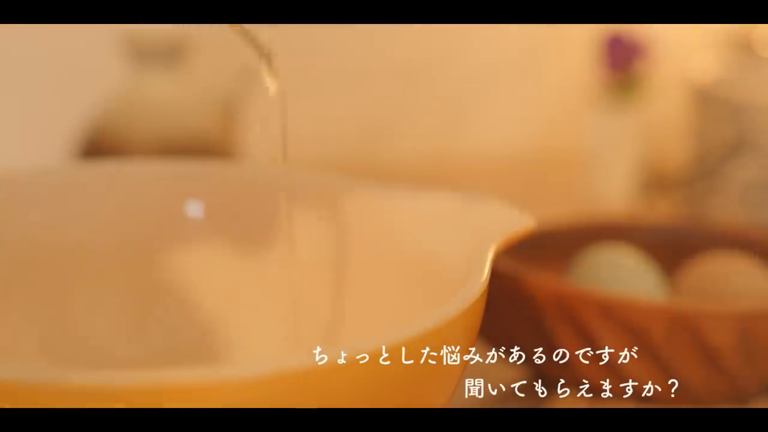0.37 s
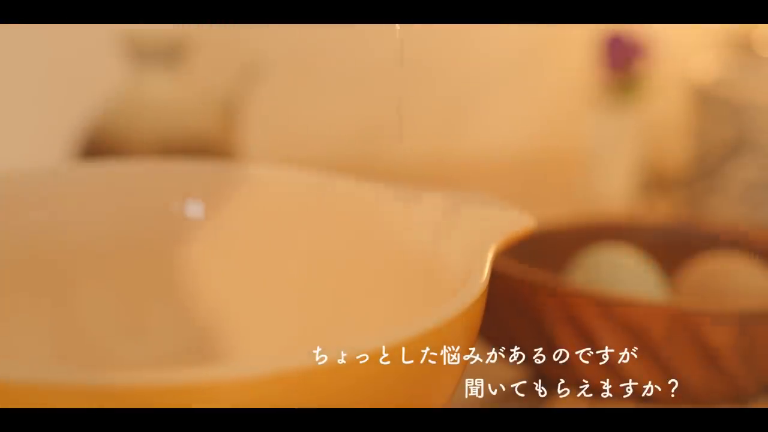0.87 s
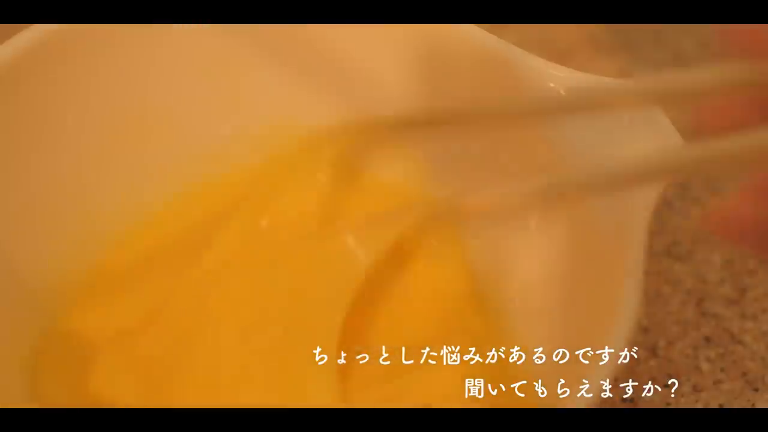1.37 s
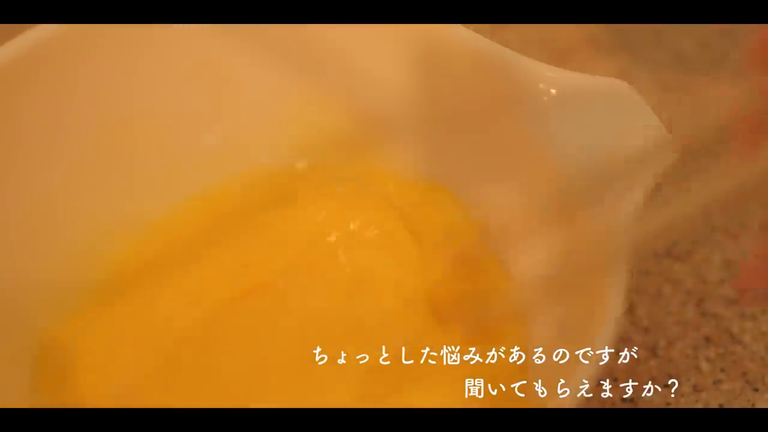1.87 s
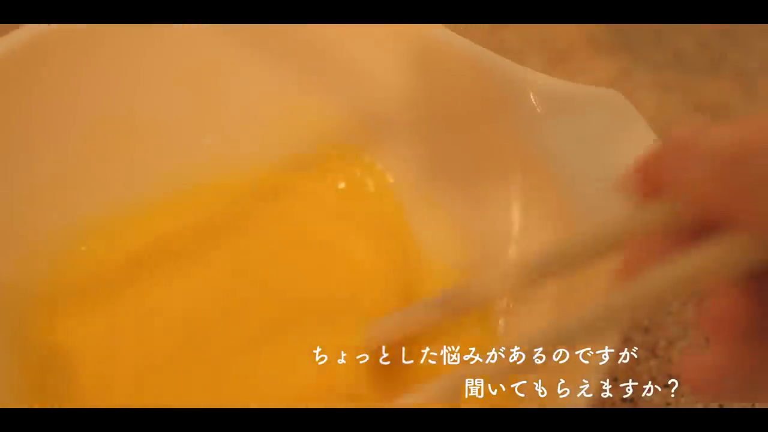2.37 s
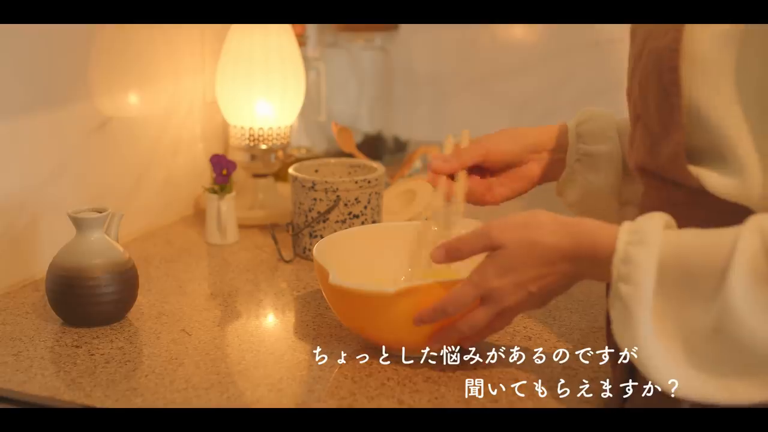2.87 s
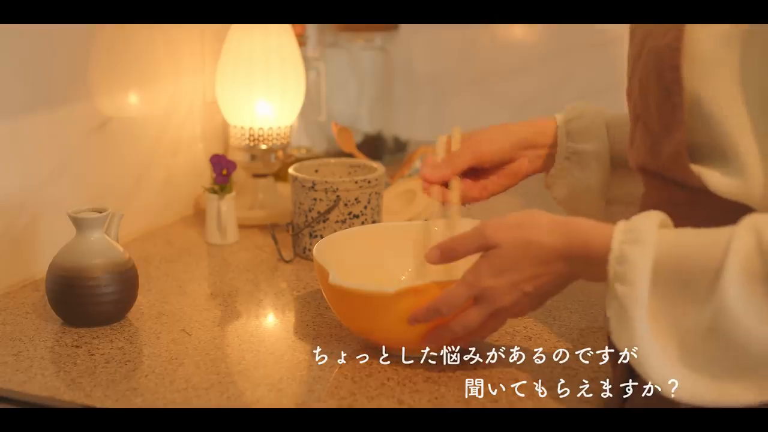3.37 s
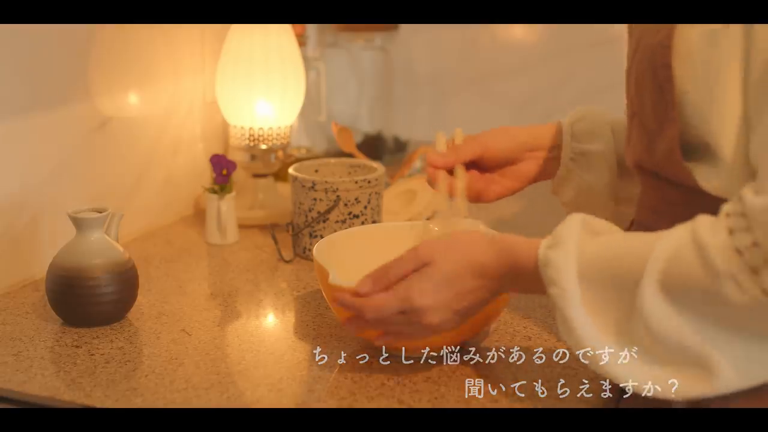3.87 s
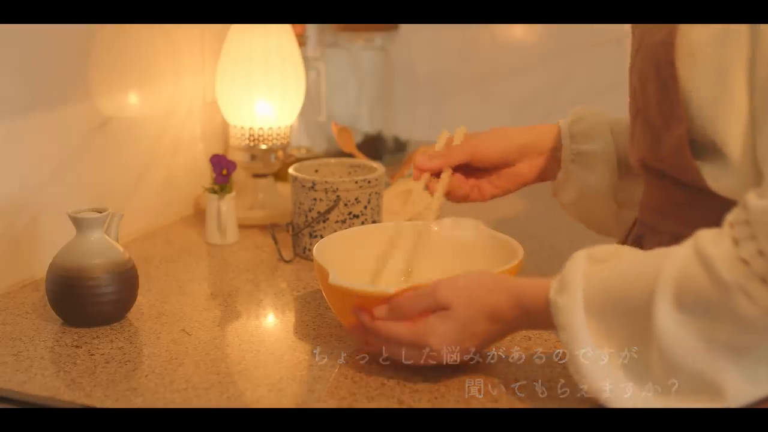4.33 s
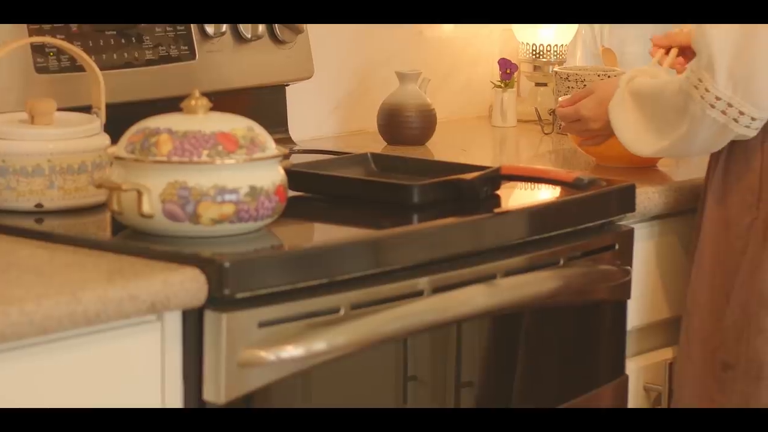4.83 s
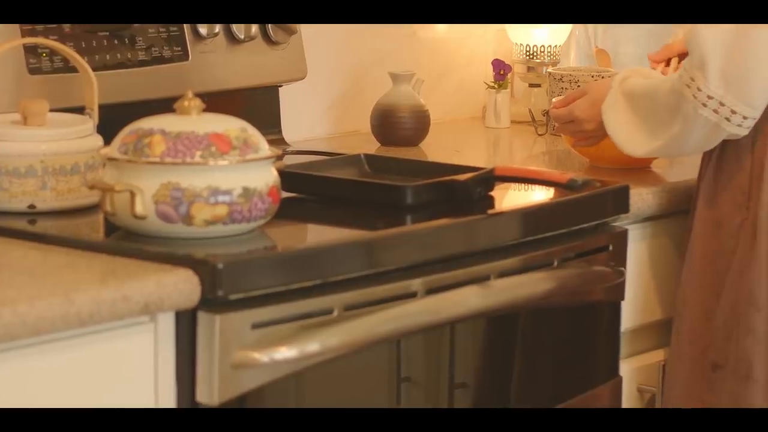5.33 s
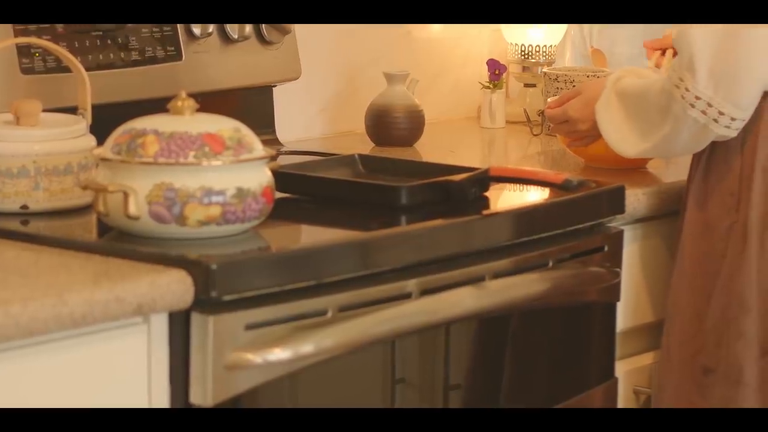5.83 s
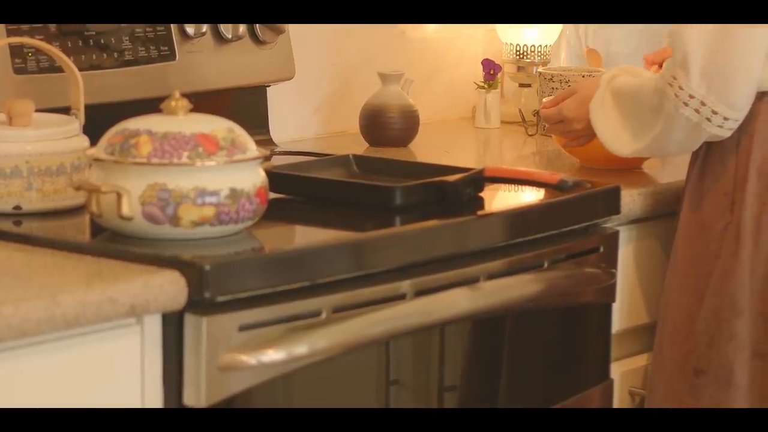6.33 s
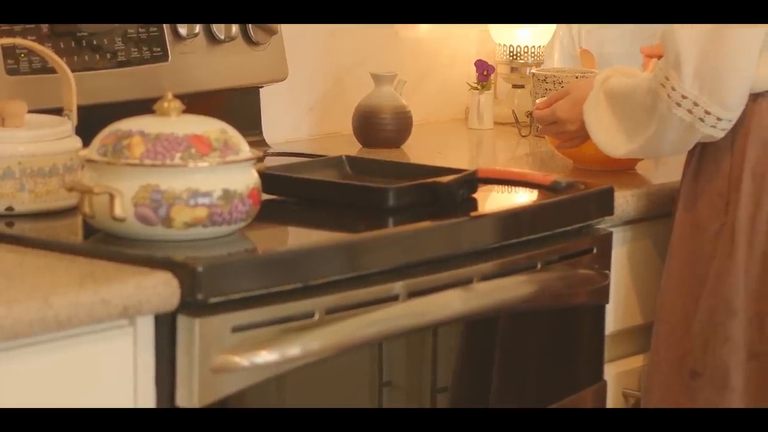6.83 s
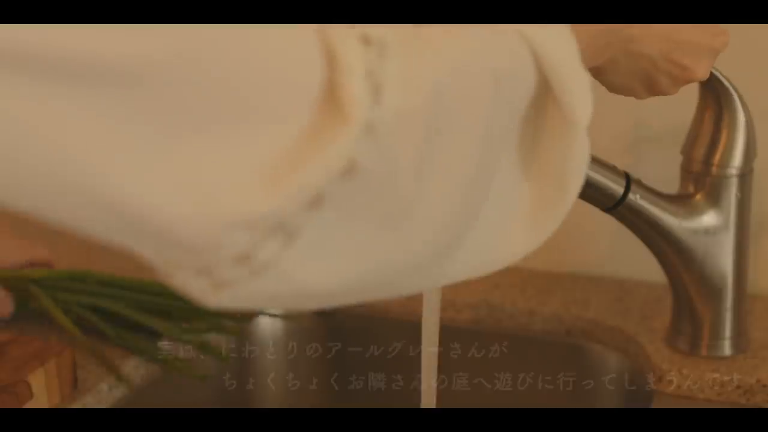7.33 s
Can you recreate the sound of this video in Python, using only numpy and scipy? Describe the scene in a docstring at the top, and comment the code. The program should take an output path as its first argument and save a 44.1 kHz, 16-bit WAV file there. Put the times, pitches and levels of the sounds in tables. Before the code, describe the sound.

Wet eggshell snaps give way to rapid clinking and sloshing of beaten eggs, ending with a hard cut to a gurgling, spraying kitchen tap.

```python
"""An eggshell is pulled apart in wet cracks: snaps, grainy hisses and the plops of small air pockets.
Sticks then beat eggs in a glazed bowl, close at first, then from further off, then the close opening again:
every blow sets the bowl's modes ringing, the egg slaps, sloshes and froths, and a small hard kitchen rings after.
Last, a hard cut to a steel sink: a tap gurgles, whistles and sprays (shaped noise) and the steel hums."""
import sys
import numpy as np
from scipy import signal
from scipy.fft import rfft, irfft, next_fast_len
from scipy.io import wavfile

SR = 44100
rng = np.random.default_rng(int(sys.argv[2]) if len(sys.argv) > 2 else 0)


def put_to_file(sound):
    """Save the sound as 16-bit audio at rate SR, in the file named by the first command-line argument."""
    columns = np.atleast_2d(sound).T  # one column per channel
    safe = np.clip(columns, -1, 1)
    whole_steps = np.round(safe * 32767)
    wavfile.write(sys.argv[1], SR, whole_steps.astype(np.int16))


def ratio(d):
    """dB to gain"""
    e = np.asarray(d, float) / 20
    return 10 ** e


N = 339570

# starts [s]: close beating, wider beating, close beating again, sink
CLOSE_S, WIDE_S, AGAIN_S, SINK_S = 1.2815, 2.615, 4.7398, 6.964
# sticks hitting the bowl, levels relative: (time [s], crack level [dB],
# ring level near 2.4 kHz [dB], near 3.8 kHz [dB], near 5.5 kHz [dB])
BLOWS = [(2.65, -8.5, -29, -24.5, -37), (2.851, -14, -27.5, -26.5, -39.5), (3.047, -20, -27, -30.5, -33.5),
         (3.234, -7, -23.5, -26.5, -31), (3.434, -14.5, -24, -29, -28), (3.63, -17.5, -19, -22.5, -29),
         (3.84, -12.5, -20.5, -27, -27), (4.057, -18.5, -30.5, -29.5, -30.5),
         (4.262, -16.5, -31.5, -35.5, -36.5), (4.455, -6.5, -26, -31.5, -29),
         (4.665, -13, -29.5, -25.5, -28.5), (4.756, -8.5, -25.5, -26, -33), (4.987, -14, -29, -29, -48.5),
         (5.204, -12.5, -22, -32, -30.5), (5.449, -14.5, -30, -28.5, -32.5),
         (5.628, -7.5, -15.5, -17.5, -11.5), (5.873, -9.5, -33, -26, -36.5), (6.078, -13, -28, -27, -57),
         (6.313, -17, -34, -33, -64.5), (6.507, -17, -34.5, -36, -58), (6.754, -4, -42, -32, -60)]
# spectrum of a stick crack or egg slap: (frequency [Hz], level [dB per Hz])
CRACK_SPECTRUM = [(120, -18.5), (200, -10.5), (1360, 3), (3070, 6), (5160, 1.5), (7600, -1.5),
                  (11400, -26.5), (15000, -11.5), (16500, -42)]


def at_hz(points, hz):
    """Reads a table of values against frequency on a log-frequency axis."""
    return np.interp(np.log(hz), np.log(np.array(points)[:, 0]), np.array(points)[:, 1])


def in_time(rows):
    """Joins the rows of a time table by straight lines, one curve per column."""
    s, *columns = np.transpose(rows)
    return [np.interp(np.arange(N) / SR, s, column) for column in columns]


def coloured(x, spectrum):
    """Gives a white signal a spectrum, keeping white noise at rms 1."""
    size = next_fast_len(len(x))
    gain = ratio(at_hz(spectrum, np.maximum(np.fft.rfftfreq(size, 1 / SR), 5)))
    gain = gain / np.sqrt(np.mean(gain ** 2))
    return irfft(rfft(x, size) * gain, size)[:len(x)]


def band(x, low_hz, high_hz):
    """Band-passes a signal and sets it to rms 1."""
    sos = signal.butter(2, [low_hz, high_hz], "band", fs=SR, output="sos")
    y = signal.sosfilt(sos, x)
    return y / np.std(y)


def high_pass(x, hz):
    """Takes away the bass below a corner frequency."""
    return signal.sosfilt(signal.butter(4, hz, "high", fs=SR, output="sos"), x)


def ring(clicks, hz, t60):
    """A two-pole resonance: a unit click sets a sine of height 1 ringing."""
    r, w = ratio(-60 / (t60 * SR)), 2 * np.pi * hz / SR
    return signal.lfilter([0, np.sin(w)], [1, -2 * r * np.cos(w), r * r], clicks + 1e-18)


def hums(modes):
    """Noise twice through each narrow resonance (frequency [Hz], width [Hz], level [dB])."""
    out = 0
    for hz, width_hz, level_db in modes:
        t60 = np.log(1000) / (np.pi * width_hz)
        tone = ring(ring(rng.standard_normal(N), hz, t60), hz, t60)
        out = out + ratio(level_db) * tone / tone.std()
    return out


def lumps(rate_hz, depth_db):
    """A gain that wanders at random: low-passed noise, read in dB."""
    step = 100   # samples per drawn point
    slow = rng.standard_normal(N // step + 2)
    slow = signal.lfilter([1], [1, -np.exp(-2 * np.pi * rate_hz * step / SR)], slow)
    wander = np.interp(np.arange(N) / step, np.arange(len(slow)), slow / slow.std())
    return ratio(depth_db * wander)


def ticks(rows, spectrum, t60, hiss_db, cycles):
    """Each tick is a snap, a grainy dying hiss and the short ring of an air pocket, rising as it closes."""
    size = 6000
    out, t = np.zeros(N + size), np.arange(size) / SR
    grain = ratio(2.9 * rng.standard_normal((len(rows), size // 40))).repeat(40, axis=1)
    noises = rng.standard_normal((len(rows), size)) * grain
    noises[:, 4] = ratio(14)   # a single click at first contact
    shape = ratio(-60 * t / t60) + ratio(2 - 60 * t / 0.0015)   # dying hiss, sharp snap
    for (s, level_db, hz, plop_db), noise in zip(rows, noises):
        burst = coloured(noise, spectrum) * ratio(level_db + hiss_db) * shape
        plop_fade = ratio(plop_db - 60 * t * np.sqrt(1000 * hz) / cycles)   # high plops die sooner
        plop = np.sin(2 * np.pi * hz * t * (1 + 1.1 * t)) * plop_fade * np.clip(t / 0.0018, 0, 1)
        flutter = band(noise, 60, 440)   # the wet wall of the pocket shakes
        at = round(s * SR)
        out[at:at + size] += burst + plop * (1 + 0.4 * flutter)
    return high_pass(out[:N], 520)


def followers(leads, latest_s, below_db, spread_db, low_hz, high_hz, plop_below_db):
    """Two smaller ticks at chance moments, levels and pitches after each lead (time [s], level [dB])."""
    s, db = np.repeat(leads, 2, axis=0).T
    draw = rng.random((len(s), 4))
    times = s + 0.0045 + latest_s * draw[:, 0]
    hisses_db = db - below_db + spread_db * (2 * draw[:, 1] - 1)
    pitches = low_hz * (high_hz / low_hz) ** draw[:, 2]
    plops_db = db - below_db - plop_below_db + spread_db * (2 * draw[:, 3] - 1)
    return list(zip(times, hisses_db, pitches, plops_db))


def kitchen(x, wet_db):
    """Adds a small hard room: half-octave bands of noise, each dying at its own rate."""
    # how long the room rings: (frequency [Hz], t60 [s])
    room_decay = [(100, 0.25), (700, 0.36), (2000, 0.49), (5000, 0.39), (13000, 0.36)]
    t, edges = np.arange(SR // 2) / SR, 70 * 2 ** np.arange(0, 8.6, .5)
    tail = 0
    for low, high in zip(edges, np.minimum(edges[1:], 19000)):
        decay = ratio(-60 * t / at_hz(room_decay, np.sqrt(low * high)))
        # equal power per Hz
        tail = tail + band(rng.standard_normal(len(t)), low, high) * np.sqrt(high - low) * decay
    tail = tail * np.clip((t - .002) / 0.004, 0, 1)   # reflections build up
    tail = tail / np.sqrt(np.sum(tail ** 2))
    return x + ratio(wet_db) * signal.fftconvolve(x, tail)[:N]


def eggshell():
    """Shell cracks and wet ticks, each trailed by smaller crackle."""
    # cracks, hiss relative: (time [s], hiss level [dB], plop starting pitch [Hz], plop level [dB])
    shell_cracks = [(0.0014, -33.5, 3410, -52), (0.049, -38, 3270, -58), (0.126, -35, 2270, -50),
                    (0.2084, -38, 1970, -43), (0.234, -34, 3040, -46), (0.2537, -32, 1700, -41),
                    (0.2628, -34, 2190, -37), (0.271, -31, 2310, -37), (0.2834, -56.5, 2900, -43),
                    (0.2894, -52, 1720, -49), (0.3127, -35, 1970, -42), (0.3156, -44, 1750, -40.5),
                    (0.3924, -45.5, 2270, -63), (0.4074, -50, 1230, -60), (0.4194, -50, 2030, -57),
                    (0.5605, -37.5, 3440, -35.5), (0.603, -26.5, 1460, -49), (0.614, -41, 3460, -52),
                    (0.6452, -34, 4600, -42), (0.7018, -42.5, 3430, -64), (0.7425, -51, 1210, -66),
                    (0.842, -56, 2620, -68), (0.862, -56, 3030, -66), (1.098, -61, 3000, -72)]
    # (frequency [Hz], level [dB per Hz])
    shell_spectrum = [(290, -58), (500, -26), (1070, -17), (2320, -6.5), (3350, -8.5), (11600, -18.5),
                      (15100, -19.5), (16500, -15)]
    crackle = followers(np.array(shell_cracks)[:, :2], latest_s=0.046, below_db=13.4, spread_db=4,
                        low_hz=1300, high_hz=4500, plop_below_db=21)
    return ticks(shell_cracks + crackle, shell_spectrum, t60=0.041, hiss_db=-15.5, cycles=54.0)


def quiet_room():
    """Bass-heavy background noise and a steady thin tone under the eggshell."""
    # (frequency [Hz], level [dB per Hz])
    quiet_spectrum = [(15, -0.5), (30, -2), (63, -15), (96, -9), (150, -21), (300, -16), (850, -18.5),
                      (1400, -21.5), (2200, -28), (5000, -39.5), (16500, -45)]
    tone = np.sin(2 * np.pi * 1195 * np.arange(N) / SR)
    return ratio(-67) * coloured(rng.standard_normal(N), quiet_spectrum) + ratio(-75) * tone


def whines():
    """Narrow whines of the kitchen: noise through sharp resonances."""
    # (frequency [Hz], resonance width [Hz], level [dB])
    whine_modes = [(7400, 90, -86)]
    return hums(whine_modes)


def stirred_egg():
    """A lumpy low slosh, small bubbles, a froth of fine clicks; each stroke swells them for a moment."""
    # (frequency [Hz], level [dB per Hz])
    froth_spectrum = [(300, -7), (1500, 12), (4000, 12), (8000, -6.5), (11500, -26), (15000, -7),
                      (16500, -26)]
    wide = np.arange(N) < AGAIN_S * SR
    # levels before the strokes swell them
    slosh_db, froth_db = np.where(wide, -44.0, -51.0), np.where(wide, -47.5, -57.0)
    blow_db = np.array(BLOWS)[:, 1]
    strokes = np.zeros(N)
    # the egg follows a share of each blow's swing in dB
    strokes[[round(row[0] * SR) for row in BLOWS]] = ratio(0.18 * (blow_db - blow_db.mean()))
    t = np.arange(SR // 5) / SR
    swell = signal.fftconvolve(strokes, t / 0.055 * np.exp(1 - (t / 0.04) ** 2))[:N]
    # a short froth hiss after each stroke, ending sharply
    froth_swell = signal.fftconvolve(strokes, np.exp(-((t - .05) / 0.051) ** 6))[:N]
    slosh = band(rng.standard_normal(N), 130, 2200) * lumps(25, depth_db=3.5)
    sizes = ratio(2.6 * np.minimum(rng.exponential(1, N), 4)) * rng.choice([-1, 1], N)
    born = rng.random(N) < 400 / SR   # 400 bubbles a second
    dealt = rng.integers(0, 8, N)     # each takes one of eight pitches
    bubbles = 0
    for k, hz in enumerate(np.geomspace(500, 4000, 8)):
        bubbles = bubbles + ring(sizes * born * (dealt == k), hz, 26.0 / hz)
    fine = sizes * (rng.random(N) < 9000 / SR)   # 9000 clicks a second
    froth = coloured(fine / fine.std(), froth_spectrum) * lumps(30, depth_db=4.0)
    wet = ratio(slosh_db) * (slosh + ratio(-10.5) * bubbles) * (0.52 + 1.6 * swell)
    return wet + ratio(froth_db) * froth * (.35 + 1.2 * froth_swell)


def egg_slaps():
    """Egg slaps and trapped-air plops; slaps and blows alike throw smaller spatter after them."""
    # slaps, hiss relative: (time [s], hiss level [dB], plop starting pitch [Hz], plop level [dB])
    slap_rows = [(2.643, -31, 900, -26), (2.838, -36, 1250, -45), (2.845, -34.5, 1300, -37),
                 (3.026, -33.5, 3000, -38), (3.034, -27.5, 2300, -17.5), (3.039, -18.5, 1600, -26),
                 (3.218, -50, 830, -33.5), (3.228, -34, 2000, -36), (3.470, -26, 1280, -48),
                 (3.667, -19.5, 585, -26.5), (3.87, -20.5, 5550, -34), (4.25, -17.5, 1530, -20),
                 (4.392, -52, 700, -36), (4.701, -31, 1470, -39), (4.742, -26.5, 925, -47),
                 (4.787, -33, 786, -36), (4.805, -25, 4000, -28), (4.933, -40.5, 1070, -42),
                 (4.956, -21, 2660, -27), (4.961, -15, 744, -24), (5.011, -21.5, 954, -26.5),
                 (5.165, -37.5, 1270, -35), (5.184, -23, 1880, -18.5), (5.192, -22, 910, -37),
                 (5.250, -20, 968, -20), (5.267, -26, 2800, -27), (5.620, -34, 2600, -30.5),
                 (5.627, -6, 2720, -8.5), (5.664, -25, 627, -27.5), (5.693, -33, 1046, -33),
                 (5.774, -55, 1020, -35), (5.835, -15.5, 640, -33), (6.057, -34, 1380, -40),
                 (6.061, -16, 5760, -13), (6.069, -23.5, 4200, -13.5), (6.112, -33, 697, -37),
                 (6.156, -31, 1530, -29), (6.276, -18.5, 690, -60), (6.304, -22, 2410, -32),
                 (6.376, -39, 1650, -26.5), (6.424, -24.5, 830, -44), (6.492, -11.5, 3160, -18.5),
                 (6.555, -21.5, 1290, -27), (6.57, -27, 2600, -27), (6.600, -44, 1100, -31.5),
                 (6.65, -53.5, 1760, -21.5), (6.67, -48, 1366, -29.5), (6.732, -27.5, 815, -39),
                 (6.735, -28, 1633, -12.5), (6.754, -12, 749, -10), (6.765, -25.5, 1860, -16),
                 (6.949, -15, 1996, -11)]
    leads = [(s, max(db, plop_db)) for s, db, _, plop_db in slap_rows]
    leads += [(s, db - 7.0) for s, db, *_ in BLOWS]
    spatter = followers(leads, latest_s=0.054, below_db=22.7, spread_db=3.6,
                        low_hz=560, high_hz=3100, plop_below_db=5)
    return ticks(slap_rows + spatter, CRACK_SPECTRUM, t60=0.051, hiss_db=-10.5, cycles=45.3)


def bowl():
    """Every blow cracks, rings all modes in a balance of its own, partly at random, and thumps the counter."""
    # modes of the bowl, levels relative:
    # (frequency [Hz], level [dB], t60 [s], extra level from further off [dB])
    bowl_modes = [(367.9, -17, 0.16, 3), (577, -10, 0.18, 1), (648, -13, .1, -3), (744, -8.5, 0.058, 2),
                  (1104, -10, 0.14, -0.5), (1369, 3, 0.12, -1), (1480, -4.5, 0.14, 0), (1660, -9, 0.041, 6),
                  (2240, -5, 0.12, -4.5), (2410, -11.5, 0.15, 4), (2423, -14, 0.42, 8),
                  (2450.7, 5, 0.083, -11), (2810, -21.5, 0.25, 4), (3052, -9, 0.065, -2),
                  (3590, -10.5, 0.089, 1), (3756, -10, 0.069, -7), (3802, 0, 0.12, -1), (3810, -14, .45, 4),
                  (4200, -8.5, 0.051, 0), (4760, -20, 0.17, 6), (5530, -3, 0.084, -12),
                  (5544, -6, 0.074, -8), (5881, -17, 0.16, 0), (6660, -18, 0.13, -3),
                  (7480, -28.5, .15, -2)]
    # centres of the mode families, whose loudness differs from blow to blow: (frequency [Hz])
    family_hz = [600, 1400, 2430, 3800, 5600]
    rows = np.array(BLOWS)
    times, crack_db, rings_db = rows[:, 0], rows[:, 1], rows[:, 2:]
    wide = times < AGAIN_S
    at = np.round(times * SR).astype(int)
    chance_db = rng.normal(0, 1.8, (len(rows), len(bowl_modes)))
    lowest_db = (crack_db + rings_db[:, 0]) / 2 - 10.0   # follows blow and mid ring
    # the ring near 1.4 kHz follows part of the crack's swing
    low_db = np.where(wide, -24, -36.5) + 0.29 * (crack_db - crack_db.mean())
    families_db = np.column_stack([lowest_db, low_db, rings_db])
    rub = rng.standard_normal(N) * lumps(80, depth_db=3.5)
    rub_fade = ratio(-60 / (.3 * SR))   # dies 60 dB in 0.3 s
    out = np.zeros(N)
    for k, (hz, level_db, t60, far_db) in enumerate(bowl_modes):
        share_db = [np.interp(np.log(hz), np.log(family_hz), row) for row in families_db]
        clicks = np.zeros(N)
        clicks[at] = ratio(share_db + chance_db[:, k] + level_db + far_db * wide - 2.5)
        # the sticks scrape on along the wall
        drag = ratio(-32.5) * rub * signal.lfilter([1], [1, -rub_fade], clicks + 1e-18)
        build = 22.0 / hz   # low modes take longer to build up
        push = ring(clicks, hz, build) * 2 * np.log(1000) / (build * SR)
        out += ring(push + drag, hz, t60)
        out += ratio(2.0) * ring(push, hz, 0.39 * t60)   # a part is damped at once by hand and egg
    out = high_pass(out, 330)   # a small bowl radiates no bass
    # a low counter thump under every blow, stronger in the wider beating
    thumps = np.zeros(N)
    thumps[at + 200] = ratio(crack_db + np.where(wide, -30.0, -42.0))
    soft = signal.sosfilt(signal.butter(2, [100, 300], "band", fs=SR, output="sos"), thumps)
    for hz, t60 in [(140, 0.092), (230, 0.12)]:   # counter top
        out += ratio(2.5) * ring(soft, hz, t60)
    cracks = [(s, db, 2250, db + 1.5) for s, db in zip(times, crack_db)]
    return out + ticks(cracks, CRACK_SPECTRUM, t60=.05, hiss_db=-14.5, cycles=6.2)


def rumble():
    """Faint low noise under the beating."""
    return ratio(-62.0) * band(rng.standard_normal(N), 14, 60)


def near_sink():
    """Bass-heavy background noise at the sink."""
    # (frequency [Hz], level [dB per Hz])
    sink_air = [(12, -32), (20, 8), (49, 1.5), (131, -11), (1210, -17), (6530, -38.5), (7510, -33),
                (8170, -43), (15200, -44), (16500, -57)]
    return ratio(-58) * coloured(rng.standard_normal(N), sink_air)


def tap():
    """Water first gurgles in the spout, then sprays through the aerator and drums on the sink."""
    # valve and splash ticks, hiss relative:
    # (time [s], hiss level [dB], plop starting pitch [Hz], plop level [dB])
    splash_rows = [(7.0014, -42, 2384, -55), (7.1344, -48.5, 1560, -62), (7.2824, -58, 2720, -52.5),
                   (7.3158, -61.5, 2700, -42.5), (7.4694, -35, 6940, -39), (7.5143, -20, 6760, -34),
                   (7.6394, -15, 6220, -35), (7.6864, -15.5, 7310, -21)]
    # air pushed out of the spout: (time [s], pitch [Hz], level [dB])
    spout_air = [(7.29, 504, -79), (7.32, 781, -56), (7.345, 1010, -52.5), (7.37, 1306, -50),
                 (7.41, 1205, -58), (7.44, 1300, -82)]
    # the spray as the stream builds: (time [s], level [dB])
    spray_build = [(7.2, -85.5), (7.31, -73.5), (7.402, -68), (7.436, -42.5), (7.476, -40), (7.7, -37.5)]
    # colour of the water: (frequency [Hz], level [dB per Hz])
    water_spectrum = [(180, -43), (300, 1.5), (513, -3.5), (597, -4), (694, -8.5), (1270, -1), (1720, -3),
                      (2030, 4), (3970, 4), (6670, 2.5), (12200, -14), (15200, 2.5), (16500, -28.5)]
    # surges of water landing in the sink: (time [s], level [dB])
    water_surges = [(7.317, -60), (7.476, -70), (7.526, -52), (7.644, -42.5)]
    # the steel sink hums under the stream: (frequency [Hz], resonance width [Hz], relative level [dB])
    steel_modes = [(85, 20, -4), (170, 50, -7), (260, 80, -12), (600, 40, -14), (1850, 50, -14),
                   (2040, 60, -12)]
    t = np.arange(N) / SR
    splashes = ticks(splash_rows, water_spectrum, t60=0.18, hiss_db=-23.0, cycles=41.0)

    since_open = t - 7.305   # s; the valve opens, the gurgle starts and grows
    gurgle_db = -58 + np.where(since_open > 0, 34.5, 2000) * since_open   # dB per s
    gurgle = band(coloured(rng.standard_normal(N), water_spectrum), 370, 4260) * lumps(26.8, depth_db=2.5)

    spout_hz, spout_db = in_time(spout_air)
    blur = band(rng.standard_normal(N), 27, 220)
    spout = np.sin(2 * np.pi * np.cumsum(spout_hz) / SR) * blur   # a blurred whistle

    spray_db, = in_time(spray_build)
    spray = band(coloured(rng.standard_normal(N), water_spectrum), 5800, 18000)
    spray = band(spray, 5000, 17700) * lumps(14, depth_db=1.5)

    # each surge swells at 602 dB per s and dies at 145.5 dB per s; the loudest is heard
    surges_db = [db + np.where(t < s, 602, -145.5) * (t - s) for s, db in water_surges]
    steel = ratio(np.max(surges_db, axis=0)) * hums(steel_modes)
    return splashes + ratio(gurgle_db) * gurgle + ratio(spout_db) * spout + ratio(spray_db) * spray + steel


def scene():
    """Lays eggshell, close beating, wider and close beating, and sink end to end."""
    t = np.arange(N) / SR
    opening = kitchen(eggshell(), wet_db=-13.0) + quiet_room() + whines()
    beating = stirred_egg() + kitchen(egg_slaps() + bowl(), wet_db=-14.0) + rumble()
    beating = beating * np.clip((SINK_S - t) / 0.004, 0, 1)   # 4 ms fade into the cut
    close = np.roll(beating, round((CLOSE_S - AGAIN_S) * SR))   # the close opening, heard early
    sink = near_sink() + whines() + tap()
    return np.select([t < CLOSE_S, t < WIDE_S, t < SINK_S], [opening, close, beating], sink)[None]


def band_limit(x):
    """A steep low-pass at the top of the band."""
    return signal.sosfilt(signal.butter(12, 16870, fs=SR, output="sos"), x)


def record(dry):
    """Peaks clip at full scale."""
    mix = np.clip(dry, -1, 1)
    return band_limit(mix)


dry = scene()
out = record(dry)
put_to_file(out)
```